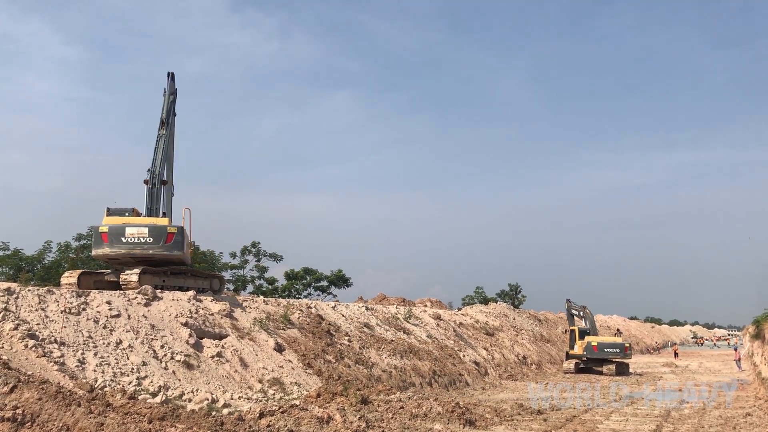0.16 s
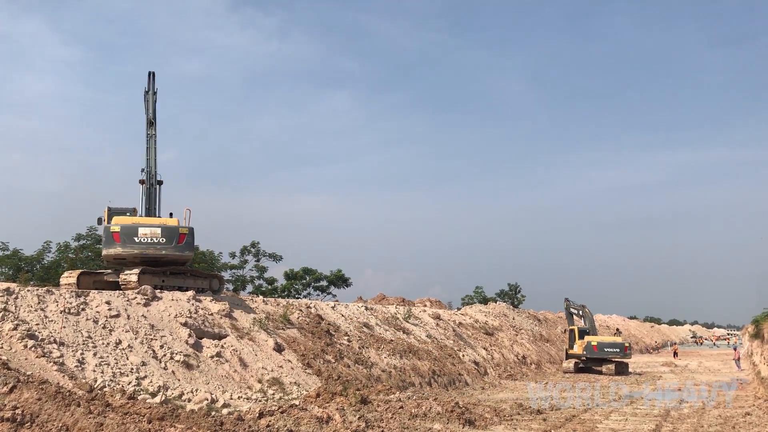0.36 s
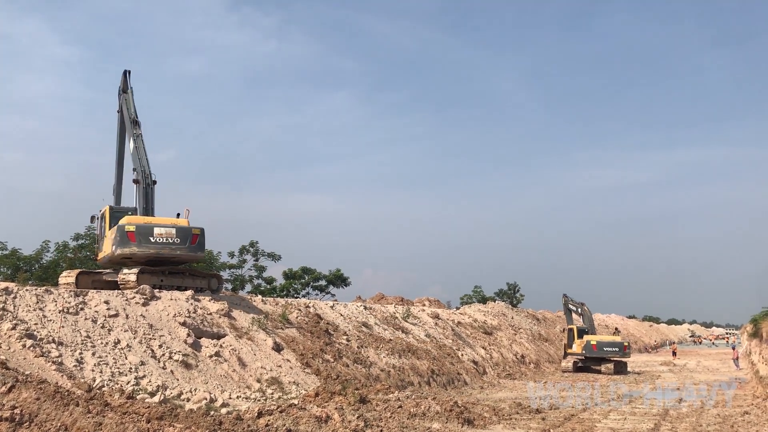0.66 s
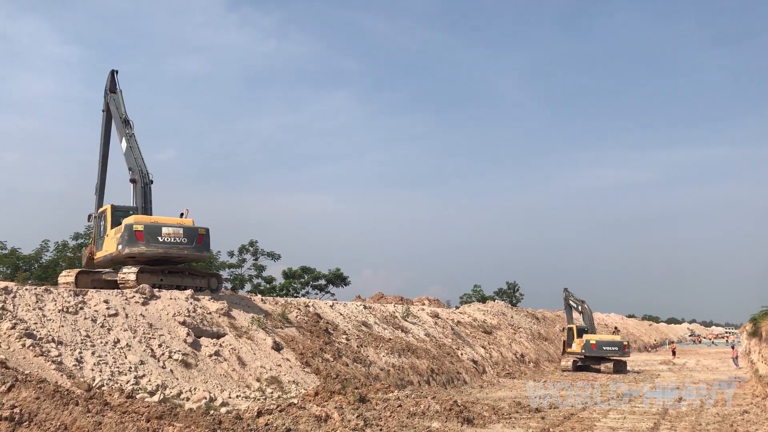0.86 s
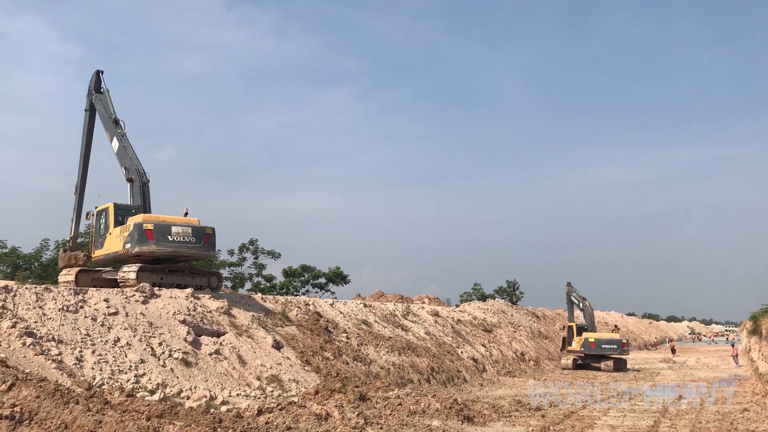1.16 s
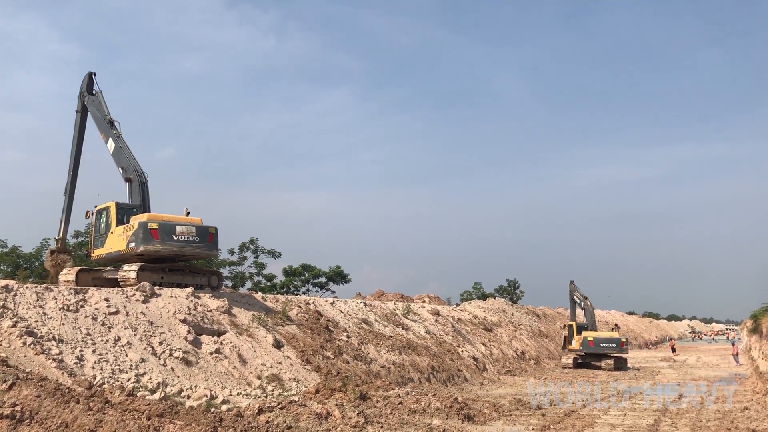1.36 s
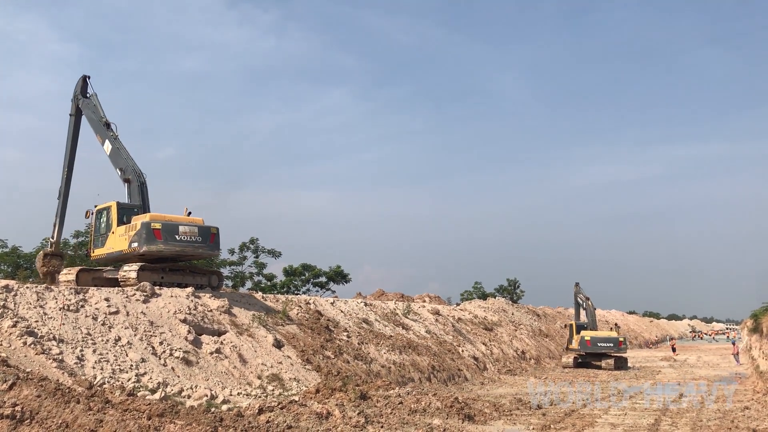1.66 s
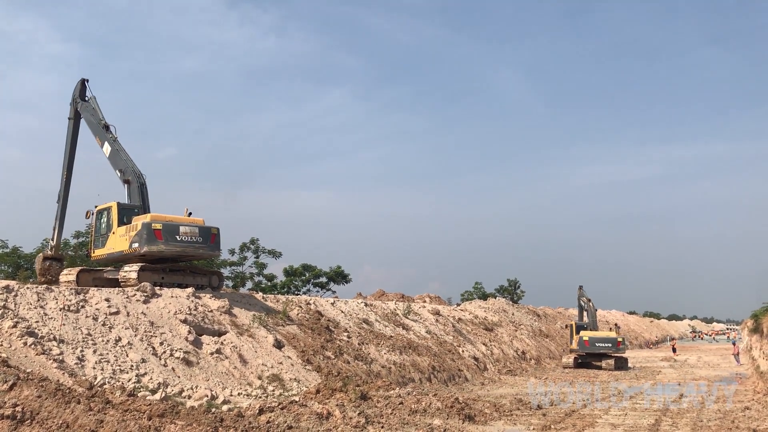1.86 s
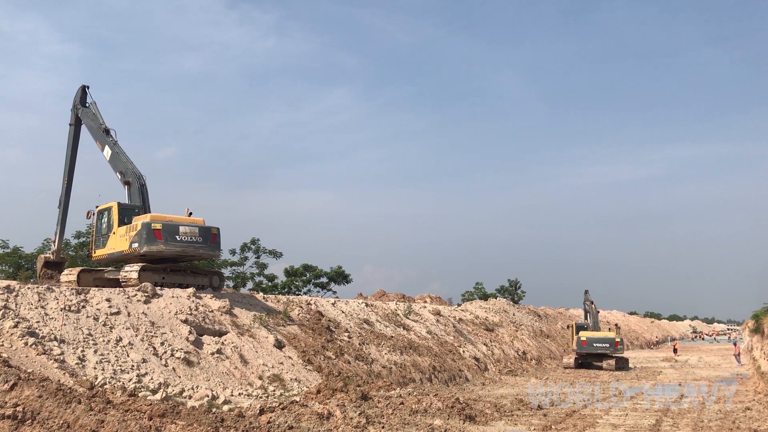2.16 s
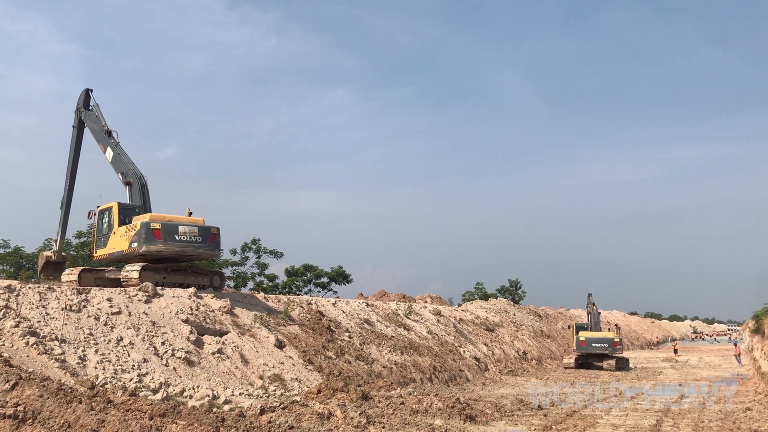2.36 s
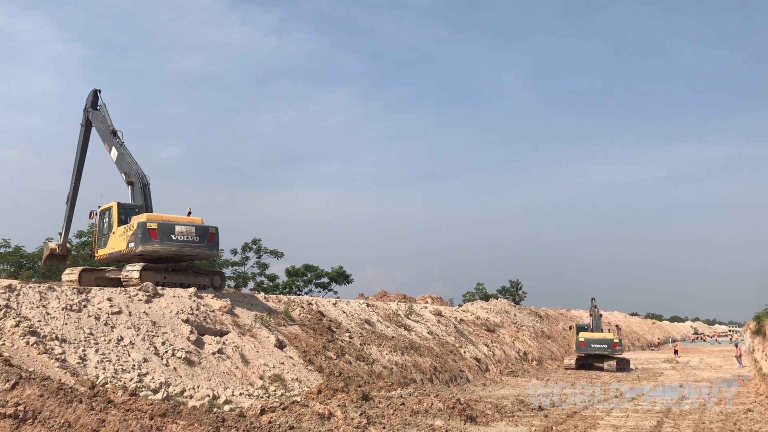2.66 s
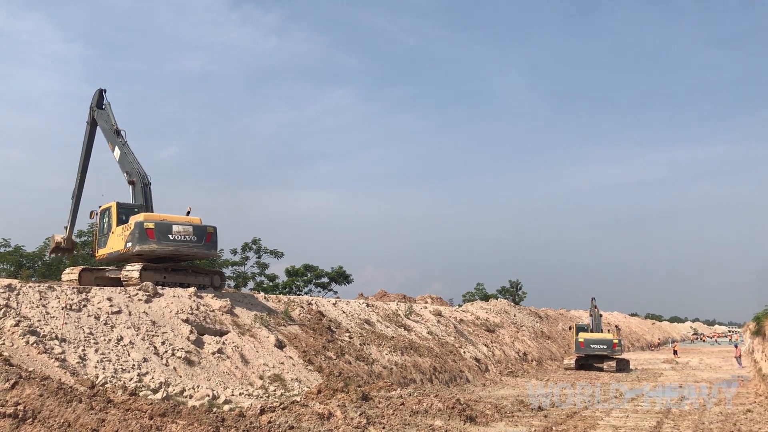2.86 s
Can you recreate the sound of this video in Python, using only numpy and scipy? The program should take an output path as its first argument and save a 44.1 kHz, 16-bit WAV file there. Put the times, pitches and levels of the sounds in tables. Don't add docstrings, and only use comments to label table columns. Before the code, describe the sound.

Low, throbbing diesel drone of an excavator outdoors, with brief bursts of metal clanks and gritty knocks

```python
import sys
import numpy as np
from scipy import signal
from scipy.fft import rfft, irfft
from scipy.io import wavfile
from scipy.ndimage import uniform_filter1d

SR = 44100
rng = np.random.default_rng(int(sys.argv[2]) if len(sys.argv) > 2 else 0)


def transcribe(signal):
    frames = np.atleast_2d(signal).T
    limited = np.clip(frames, -1, 1)
    pcm = np.round(limited * 32767).astype(np.int16)
    wavfile.write(sys.argv[1], SR, pcm)


def voltage_ratio(decibels):
    exponent = np.asarray(decibels, float) / 20
    return 10 ** exponent


N = 132300

# t/s, firing rate f/Hz, third-order level/dB
NEAR_ENGINE = [(0, 76.94, -56), (.3, 78.8, -46.5), (.6, 80.1, -58), (.82, 78.9, -50), (1, 77.33, -58.5),
               (1.3, 76.03, -53), (1.4, 75.04, -42.5), (1.6, 76, -40.5), (1.8, 78.07, -46),
               (2, 78.32, -45.5), (2.2, 76.8, -48.5), (2.45, 74.1, -41), (2.65, 75.8, -58.5),
               (2.82, 77.1, -44.5), (3, 77.33, -48)]
# multiple of the firing rate [1], level/dB re third order
NEAR_ORDERS = [(7 / 3, -16), (4, -13), (13 / 3, -18), (6, -10), (4 / 3, -40), (5 / 3, -14)]
# t/s, level/dB
FIRING_BEAT = [(.27, -37.5), (.33, -49.5), (.39, -31.5), (.49, -53), (.58, -39.5), (.76, -39), (.84, -51),
               (.95, -36.5), (1.2, -37), (1.33, -42.5), (1.42, -36.5), (1.62, -33), (1.8, -43), (2, -35.5),
               (2.38, -37.5), (2.52, -30.5), (2.8, -33.5), (2.95, -40)]
# t/s, level/dB
BAY_FACING = [(0.0, -68), (0.48, -67.5), (0.93, -66.5), (1.53, -67), (1.65, -68), (2.66, -70.5),
              (2.81, -68), (3.0, -69)]
# t/s, level/dB
CAB_GROWL = [
    (0, -3.5),
    (.7, 4.5),
    (1.2, -4.5),
    (1.5, -6.5),
    (2, 1.5),
    (2.3, -3),
    (3, -2.5),
]
# f/Hz, level/dB per Hz
RUMBLE_SPECTRUM = [(13, -38), (22, -49), (47, -5), (77, 4), (97, 4), (123, 1), (220, 1.5), (450, -9),
                   (520, -23), (680, -61), (1140, -120)]
# f/Hz, level/dB per Hz
CLATTER_SPECTRUM = [(280, -19), (480, -0.5), (504, -1.5), (662, 0.5), (885, -3.5), (964, -0.5),
                    (1060, -2.5), (1380, -4.5), (2100, -9), (2730, -46), (4620, -120)]
# f/Hz, level/dB per Hz
HISS_SPECTRUM = [(1900, -4.5), (2300, 0.5), (2600, -1), (4400, -2.5), (6000, -7.5), (7700, -13.5),
                 (9300, -13.5), (13200, -13)]
# t/s, peak level/dB, rattle decay/s, brightness level/dB
CLANKS = [(0, -37, 0.55, -17), (.149, -31.5, 0.13, 12.5), (.195, -40, 0.037, 3), (0.349, -32.5, .1, 9.5),
          (0.364, -27, 0.14, 2), (0.389, -31.5, 0.11, 1), (.43, -34, 0.23, -2), (.455, -40.5, 0.11, 9),
          (0.502, -38, 0.1, -8), (.746, -37.5, 0.2, 5.5), (.906, -34, 0.12, 2), (1.53, -30.5, 0.12, -10),
          (1.597, -35, 0.079, 10), (1.629, -37.5, 0.21, 11), (1.815, -34, 0.16, 9.5),
          (1.874, -30, 0.12, -5), (1.893, -31.5, 0.11, 0), (1.911, -25, 0.042, 10.5), (1.94, -29, 0.038, 7),
          (1.953, -36, 0.039, 5), (1.973, -30, 0.11, -2)]
# f/Hz, level/dB per Hz
GRIT_SPECTRUM = [(350, 9), (600, 8), (1700, -0.5), (1950, -7), (2400, -8.5), (4000, -13.5), (6300, -22),
                 (7500, -37)]
# peak t/s, level/dB, f/Hz, length/s
PINGS = [(.156, -45, 2217, .007), (.157, -36, 1050, .011), (.178, -40, 1140, .008),
         (.198, -53, 2885, 0.016), (.2, -37, 810, 0.0075), (0.365, -32.5, 670, 0.0162),
         (.374, -33, 599, .022), (.376, -36, 1690, 0.01), (0.382, -45, 1270, 0.0094),
         (.396, -30, 650, .014), (.399, -53, 1270, .007), (0.402, -43, 1658, .014),
         (0.47, -47, 1680, 0.019), (1.601, -38, 1167, .013), (1.614, -46, 2260, .006),
         (1.623, -37, 1370, 0.0061), (1.631, -38, 1363, .013), (1.657, -47, 2325, .02),
         (1.679, -39, 1100, .01), (1.822, -43, 2360, 0.0091), (1.869, -46, 2350, 0.0066),
         (1.897, -34, 1480, .006), (1.905, -39, 600, 0.0078), (1.914, -49, 2880, .009),
         (1.919, -25, 1630, .006), (1.92, -34, 805, 0.0066), (1.925, -38, 1076, 0.018),
         (1.942, -35, 1270, 0.011), (1.941, -34.5, 2325, .006), (1.953, -35.5, 1400, .007),
         (1.959, -48.5, 5110, 0.016), (1.976, -45, 2480, .006), (2.282, -46, 1420, 0.0073),
         (2.388, -37, 775, 0.0075)]
# t/s, level/dB, f/Hz
THUDS = [
    (0.149, -35, 181),
    (0.369, -35, 127),
    (.44, -35, 141),
    (1.948, -31.5, 232.7),
    (1.95, -33, 329.4),
    (1.962, -33, 287),
    (2.039, -35, 321.2),
]
# t/s, firing rate f/Hz, second-order level/dB
FAR_ENGINE = [(0, 74.8, -52.5), (.4, 75.14, -49), (.65, 75.64, -52.5), (.9, 74.17, -47), (1.3, 76.07, -48),
              (1.5, 75, -47), (1.7, 77.98, -50.5), (2.05, 76.2, -43), (2.4, 76.36, -49), (3, 75.3, -48)]
# multiple of the firing rate [1], level/dB re second order
FAR_ORDERS = [(2, -0.062), (8 / 3, -2.5), (7 / 3, -10), (11 / 3, -10.5), (13 / 3, -6.5), (16 / 3, -19.5)]
# f/Hz, width/Hz, level/dB
BANK_ECHO = [(506, 52, -6.5), (939, 21, -12.5), (1710, 250, 1), (1943, 123, -5), (2285, 32, 5),
             (4790, 250, -3.5), (7300, 210, -1), (9100, 330, 5.5)]
# low f/Hz, high f/Hz, share of time present [1]
TREBLE_BANDS = [(7100, 7450, .97), (7750, 8200, .89), (8400, 8750, .96), (9300, 9800, .97),
                (9800, 10400, .62), (10400, 10950, .01), (10950, 11850, .6), (11850, 12500, .28),
                (12500, 13200, .025), (13200, 22050, -.1)]
# t/s, relative share [1]
TOP_PRESENCE = [(0, 0), (1.3, 0), (1.8, -.14), (2.1, -.16), (2.45, -.12), (2.6, .05), (3, 0)]
# t/s, share of time present [1]
EDGE_PRESENCE = [(0, .45), (.5, .5), (.6, .9), (1.8, .85), (1.9, .2), (3, .15)]


def rms_one(x):
    return x / np.sqrt(np.mean(x ** 2) + 1e-20)


def in_time(rows):
    s, *columns = np.transpose(rows)
    return [np.interp(np.arange(N) / SR, s, c) for c in columns]


def bins_hz():
    return np.arange(N // 2 + 1) * SR / N


def drift(rate_hz):
    stride, settle = 40, 2000
    pole = np.exp(-2 * np.pi * stride * rate_hz / SR)
    noise = rng.standard_normal(N // stride + settle + 2)
    slow = signal.lfilter([1], [1, -2 * pole, pole * pole], noise)[settle:]
    return np.interp(np.arange(N) / stride, np.arange(len(slow)), rms_one(slow))


def ring(x, hz, t60):
    pole, angle = voltage_ratio(-60 / (t60 * SR)), 2 * np.pi * hz / SR
    feedback = [1, -2 * pole * np.cos(angle), pole * pole]
    return signal.lfilter([0, np.sin(angle)], feedback, x + 1e-18)


def coloured_noise(spectrum, patchy_db, count):
    hz = bins_hz() + SR / N
    at, db = np.transpose(spectrum)
    inside = (hz > at[0]) * (hz < at[-1])
    shaped = rfft(rng.standard_normal(N)) * voltage_ratio(np.interp(np.log(hz), np.log(at), db)) * inside
    place = np.log(hz / at[0]) / np.log(at[-1] / at[0]) * (count - 1)
    together = drift(3.7)
    out = np.zeros(N)
    for k in range(count):
        band = irfft(shaped * np.clip(1 - abs(place - k), 0, 1), N)
        out += band * voltage_ratio(patchy_db * (0.35 * together + drift(10.4)))
    return rms_one(out)


def orders(turns, table, wobble_db):
    out = np.zeros(N)
    for multiple, db in table:
        phase = 2 * np.pi * multiple * turns + 0.12 * drift(3.8) + rng.uniform(0, 2 * np.pi)
        out += np.sqrt(2) * voltage_ratio(db + wobble_db * drift(9.2)) * np.sin(phase)
    return out


def near_engine():
    hz, third_db = in_time(NEAR_ENGINE)
    turns = np.cumsum(hz) / SR
    firing = np.cos(2 * np.pi * turns)
    facing_db = facing()
    return engine_tones(turns, third_db) + rumble() + cab_growl() + clatter(firing, facing_db) \
        + fan_hiss(firing, facing_db)


def engine_tones(turns, third_db):
    beat_db, = in_time(FIRING_BEAT)
    fundamental = voltage_ratio(beat_db) * orders(turns, [(0.99, 0)], wobble_db=0.3)
    third = voltage_ratio(third_db + drift(14.0)) * orders(turns, [(3, 0)], wobble_db=1.5)
    others = voltage_ratio(third_db.mean()) * orders(turns, NEAR_ORDERS, wobble_db=4.5)
    return fundamental + third + others


def facing():
    db, = in_time(BAY_FACING)
    return db - db.mean()


def rumble():
    return voltage_ratio(-43) * coloured_noise(RUMBLE_SPECTRUM, patchy_db=0.9, count=8)


def cab_growl():
    mode_hz, width_hz, level_db = 378, 125, -47.5
    load_db, = in_time(CAB_GROWL)
    panels = ring(rng.standard_normal(N), mode_hz, 1.87 / width_hz)
    return voltage_ratio(level_db + load_db) * rms_one(panels)


def clatter(firing, facing_db):
    noise = coloured_noise(CLATTER_SPECTRUM, patchy_db=1.16, count=8)
    return voltage_ratio(-48.5 + 0.073 * facing_db) * (1 + 0.081 * firing) * noise


def fan_hiss(firing, facing_db):
    hz = bins_hz()
    hiss = coloured_noise(HISS_SPECTRUM, patchy_db=1.14, count=8) * (1 + 0.051 * firing)
    treble = irfft(rfft(hiss) * np.clip((hz - 5500) / 3000, 0, 1) * (hz < 10700), N)
    return voltage_ratio(-53.5 + 0.096 * facing_db) * (hiss + (voltage_ratio(1.35 * facing_db) - 1) * treble)


def clanks():
    touches_per_s, level_db, rise_s = 2500, -9, 0.003
    out, size = np.zeros(N + SR), SR // 4
    t = np.arange(size) / SR
    crunch = coloured_noise(GRIT_SPECTRUM, patchy_db=-0.9, count=8)
    dull = signal.sosfiltfilt(signal.butter(1, 2200, fs=SR, output="sos"), crunch)
    for s, db, decay, bright_db in CLANKS:
        start = int(s * SR)
        fade = voltage_ratio(-30 * t / max(decay, 0.004)) * (1 - np.exp(-t / rise_s))
        touches = rng.standard_normal(size) * (rng.random(size) < touches_per_s / SR)
        density = uniform_filter1d(touches ** 2, size=88) * SR / touches_per_s
        lumps = np.sqrt(0.6 + 0.4 * density)
        grit = (dull + voltage_ratio(bright_db) * (crunch - dull))[start:start + size]
        out[start:start + size] += voltage_ratio(db + level_db) * fade * lumps * grit
    return out[:N]


def pings():
    out, t = np.zeros(N + SR), np.arange(SR // 8) / SR
    for s, db, hz, length in PINGS:
        rise = max(length, 0.003) / np.e
        start = int((s - rise) * SR)
        swell = (t / rise * np.exp(1 - t / rise)) ** 2
        out[start:start + len(t)] += voltage_ratio(db - 1.5) * swell * np.sin(2 * np.pi * hz * t)
    return out[:N]


def thuds():
    rise_s, t60_s = 0.0044, 0.26
    out = np.zeros(N)
    for s, db, hz in THUDS:
        after = np.maximum(np.arange(N) / SR - s, 0)
        swell = 1 - np.exp(-after / rise_s)
        out += voltage_ratio(db - 60 * after / t60_s) * swell * np.sin(2 * np.pi * hz * after)
    return out


def far_engine():
    hz, db = in_time(FAR_ENGINE)
    return voltage_ratio(db) * orders(np.cumsum(hz) / SR, FAR_ORDERS, wobble_db=1.5)


def over_ground(x):
    hz = bins_hz()
    gain_db = sum(db * np.exp(-((hz - at) / width) ** 2) for at, width, db in BANK_ECHO)
    return irfft(rfft(x) * voltage_ratio(gain_db), N)


def scene():
    return over_ground(near_engine() + clanks() + pings() + thuds() + far_engine())[None]


def treble_dropouts(x):
    block, first_block = 1024, 589
    hz, spectrum = bins_hz(), rfft(x)
    lift = in_time(TOP_PRESENCE)[0][::block]
    for low, high, share in TREBLE_BANDS:
        chance = np.convolve(rng.random(len(lift)), [1, -0.1], "same")
        rank = np.argsort(np.argsort(chance)) / len(lift)
        if low < 10000 < high:
            present = in_time(EDGE_PRESENCE)[0][::block]
        else:
            present = share + 3 * share * lift * (low > 10000)
        lost = np.roll(np.repeat(rank > present, block)[:N], first_block - block)
        fade = uniform_filter1d(lost * 1.0, size=block // 4)
        fade = uniform_filter1d(fade, size=block // 4)
        x = x - fade * irfft(spectrum * (hz >= low) * (hz < high), N)
    return x


def band_limit(x):
    return signal.sosfilt(signal.butter(12, 13590, fs=SR, output="sos"), x)


def record(dry):
    high_pass = signal.butter(2, 38, "high", fs=SR, output="sos")
    mix = treble_dropouts(signal.sosfilt(high_pass, dry))
    return band_limit(mix)


dry = scene()
out = record(dry)
transcribe(out)
```